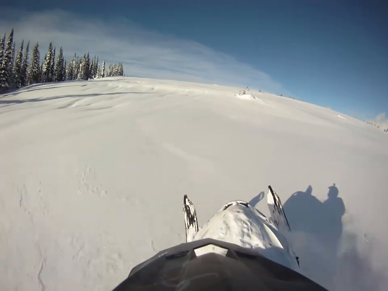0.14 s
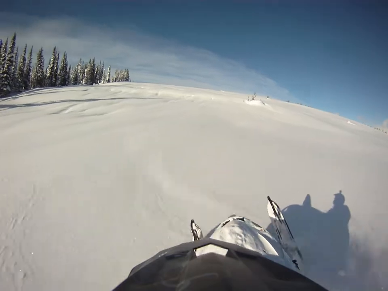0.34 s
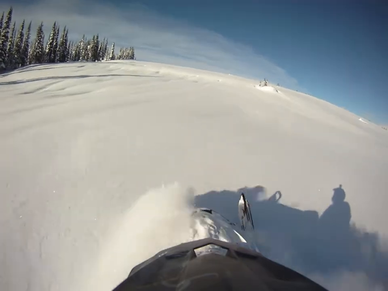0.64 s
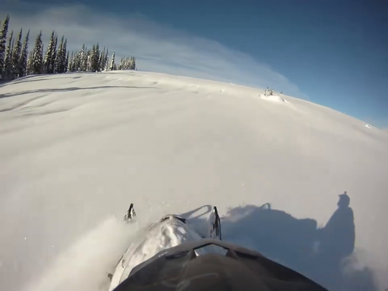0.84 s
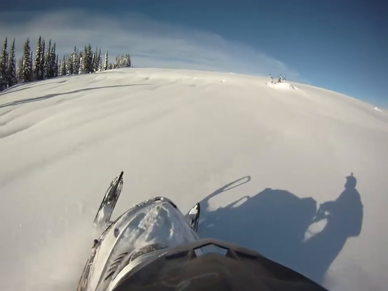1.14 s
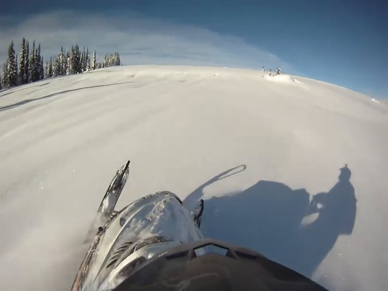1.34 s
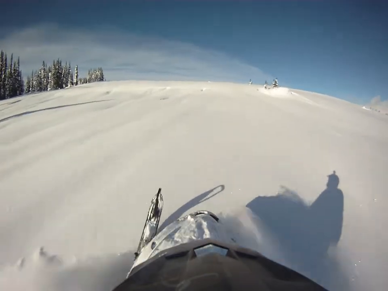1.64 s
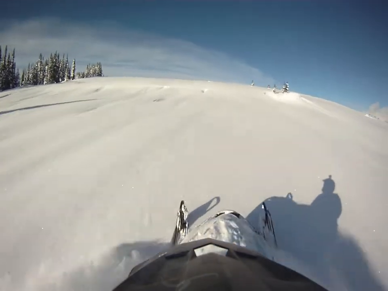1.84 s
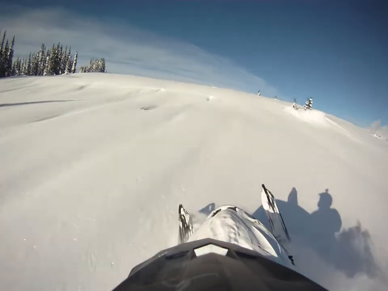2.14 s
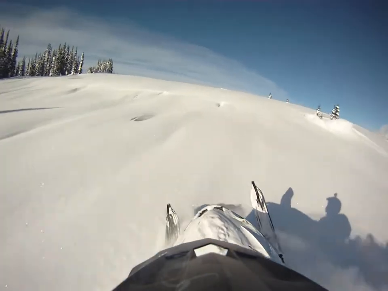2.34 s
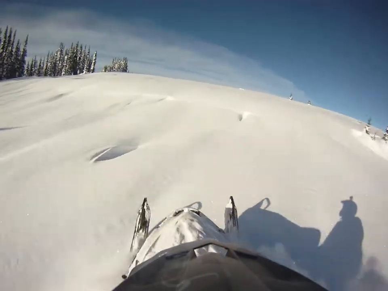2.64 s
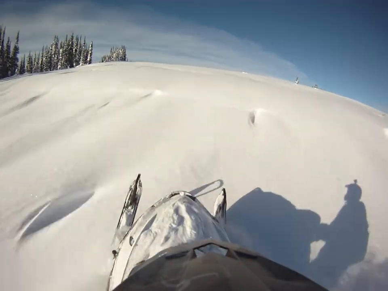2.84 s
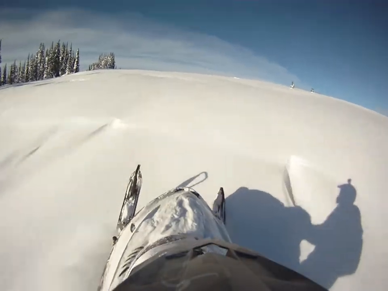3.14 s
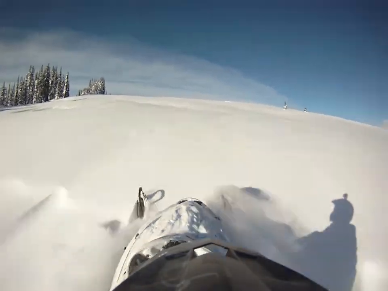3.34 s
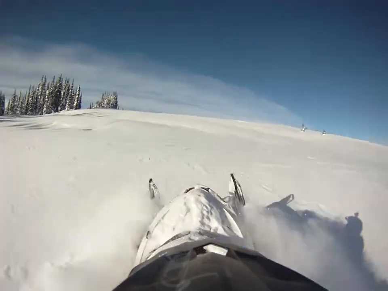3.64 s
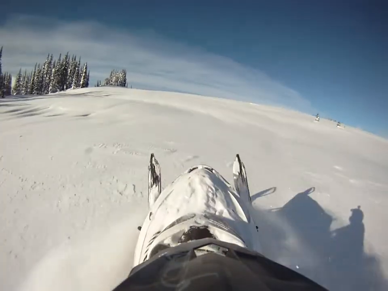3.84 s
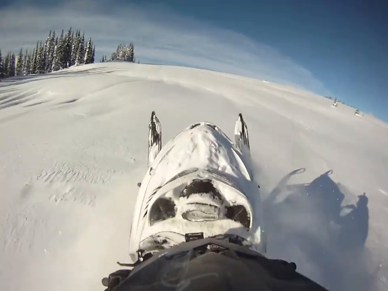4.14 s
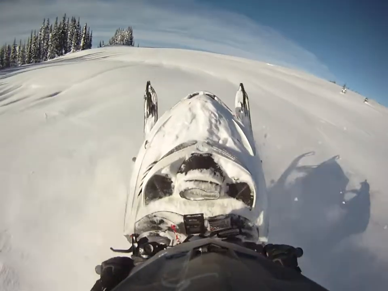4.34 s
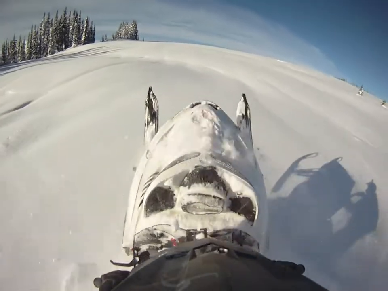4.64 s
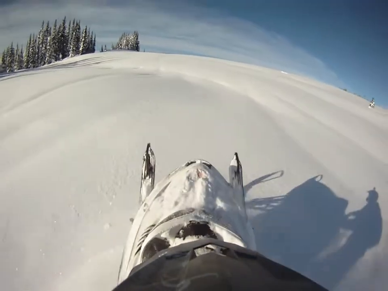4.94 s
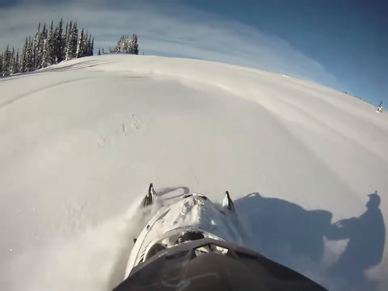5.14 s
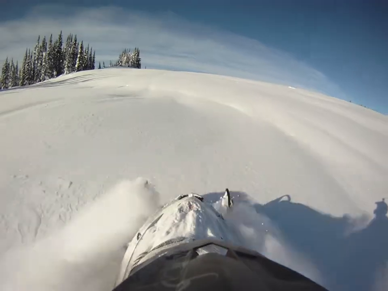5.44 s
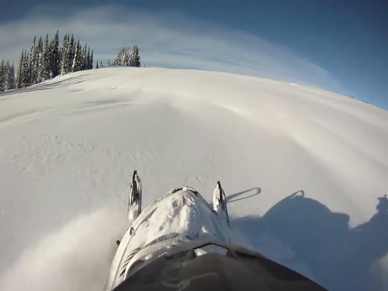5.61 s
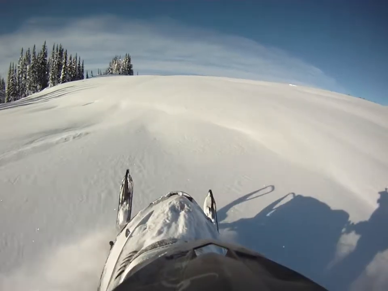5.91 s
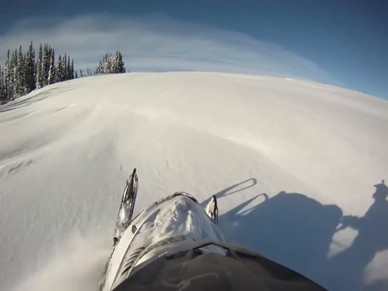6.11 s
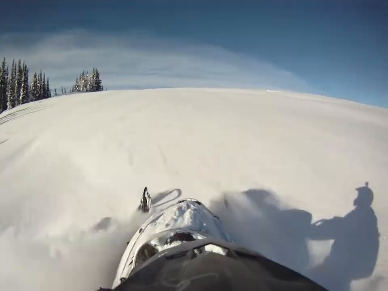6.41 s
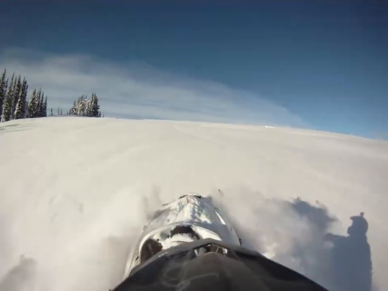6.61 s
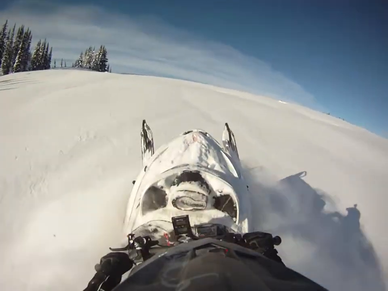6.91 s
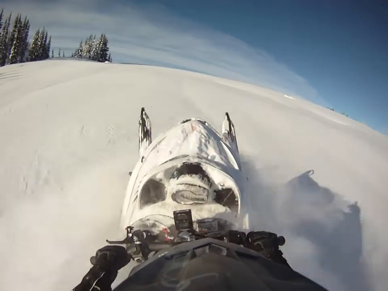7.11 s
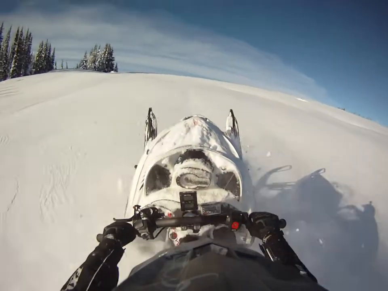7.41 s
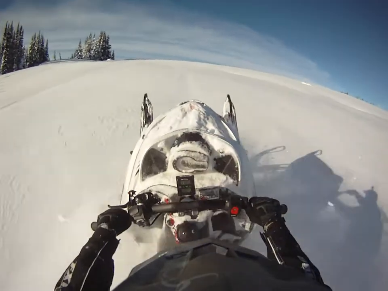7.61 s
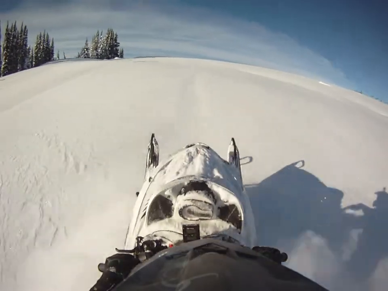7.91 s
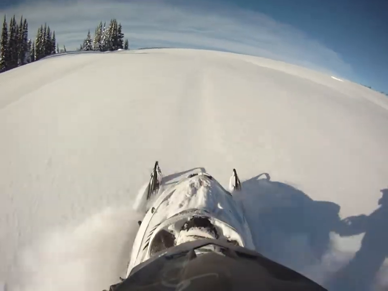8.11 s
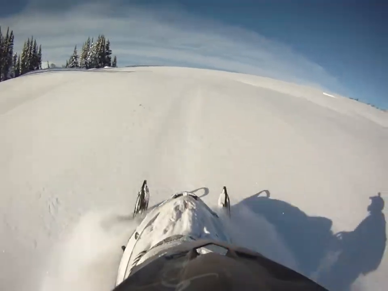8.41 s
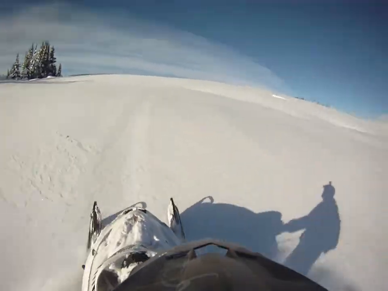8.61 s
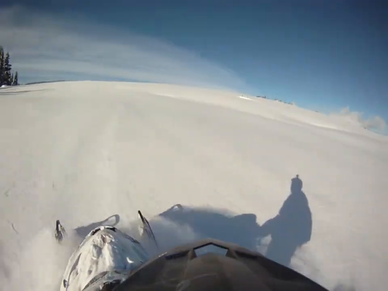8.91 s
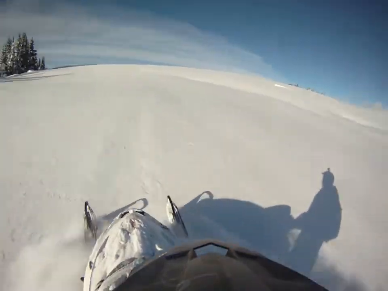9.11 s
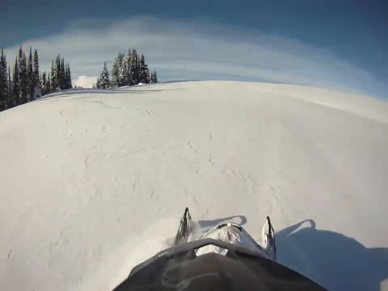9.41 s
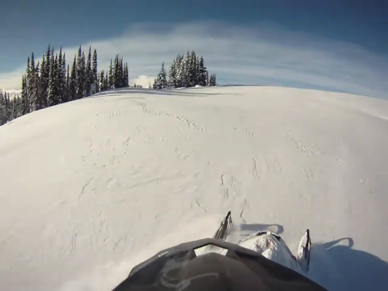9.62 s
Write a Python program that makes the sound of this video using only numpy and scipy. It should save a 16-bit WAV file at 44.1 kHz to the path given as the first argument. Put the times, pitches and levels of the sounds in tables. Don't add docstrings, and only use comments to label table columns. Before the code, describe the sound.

From the first instant a two-stroke snowmobile engine runs at full throttle, a loud, dense, nasal buzz with a ringing mid-range and a gritty metallic edge, as if heard through a sealed case on the rider's helmet. The pitch sags around 0.8 s, climbs, dips again near 2 and 2.7 s, and drops more sharply at 3.7 s before recovering to a tight whine. Further sags come at 4.8, 5.5, 6.5 and 6.8 s, with timbre shifting throughout and a small jolt near 4.8 s. Low wind buffeting, fast track drumming and a faint hiss of thrown snow sit underneath. It holds high around 7.5 s, sags near 8.1 s, then at 8.4 s the throttle shuts and the note plunges, rougher and quieter. A dull intake pop at 8.7 s leads into one blip peaking about 9.0 s, then a second, higher one at 9.4 s, before falling to a low, uneven burble at the end.

```python
import sys
import numpy as np
from scipy import signal
from scipy.fft import rfft, irfft
from scipy.io import wavfile
from scipy.ndimage import uniform_filter1d, map_coordinates

SR = 44100
rng = np.random.default_rng(int(sys.argv[2]) if len(sys.argv) > 2 else 0)


def unload_audio(sound):
    columns = np.transpose(np.atleast_2d(sound))
    steps = np.round(np.clip(columns, -1, 1) * 32767)
    wavfile.write(sys.argv[1], SR, steps.astype(np.int16))


def decibels_to_gain(level_db):
    exponent = np.asarray(level_db, float) / 20
    return 10 ** exponent


N = 430416
T = np.arange(N) / SR
HZ = np.fft.rfftfreq(N, 1 / SR)


def evened(x):
    return x / np.sqrt(np.mean(x ** 2) + 1e-20)


def curves(rows):
    s, *columns = np.transpose(rows)
    return [np.interp(T, s, column) for column in columns]


def modes(table, hz):
    power = 0
    for centre, width, db in table:
        power = power + (decibels_to_gain(db) / (1 + (2 * (hz - centre) / width) ** 2)) ** 2
    return np.sqrt(power)


def slope(points):
    hz, db = np.transpose(points)
    return decibels_to_gain(np.interp(np.log(HZ + 1), np.log(hz + 1), db))


def coloured(x, gain):
    return evened(irfft(rfft(x) * gain, N))


def drift(per_s, count=1):
    s = np.arange(0, N / SR + .02, .01)
    rate = np.geomspace(per_s / 8, per_s, 16)[:, None]
    start = rng.random((count, 16, 1))
    sines = np.sin(2 * np.pi * (rate * s + start))
    lines = (sines / np.sqrt(rate)).sum(1)
    return [np.interp(T, s, evened(line)) for line in lines]


# centre in Hz, width in Hz, level in dB.
HOUSING = [(628.5, 14.4, -14), (1297.6, 118, 1), (1528, 92, -6), (1730, 326, -5), (2140, 1170, -10.5),
           (3440, 540, -20.5), (5450, 2300, -29)]
# frequency in Hz, level in dB.
RASP = [(2600, -33), (3000, -3), (3700, -2.5), (4100, -8), (5400, -3), (5600, -5.5), (6300, -24)]


def engine():
    speed, throttle, _, rasp_db = controls()
    off_pipe = np.clip((111 - speed) / 6, 0, 1)
    slowing = np.gradient(speed) < 0
    coasting = uniform_filter1d(off_pipe * slowing, 900)
    ragged = np.clip(.18 + .55 * coasting, .15, 1)
    wobble = evened(uniform_filter1d(rng.standard_normal(N), 400))
    unsteadiness = .0018 + .003 * off_pipe + .01 * coasting
    turns = np.cumsum(speed * (1 + unsteadiness * wobble)) / SR
    own_db, body_db = engine_levels(speed, throttle)
    strong, stack, rasp = crank_orders(speed, turns, off_pipe, own_db)
    body = decibels_to_gain(2.5) * np.sqrt(1 - ragged) * evened(stack)
    body += decibels_to_gain(3.5) * np.sqrt(ragged) * gas_roar(turns)
    rasp_colour = slope([(2200, -80)] + RASP + [(6800, -60)])
    high = decibels_to_gain(rasp_db - 2) * coloured(rasp, rasp_colour)
    return strong + decibels_to_gain(body_db) * body + high


# centre in Hz, width in Hz, level in dB.
PIPE = [(340, 180, -5), (417, 60, -29), (633, 43, -15.5), (763, 108, -15.5), (873, 63, -9), (990, 41, -32),
        (1298, 127, 7.5), (1514, 55, 0), (1667, 160, -1.5), (1821, 260, -7), (2240, 430, -10),
        (2444, 61, -5), (2667, 133, -14.5)]
# centre in Hz, width in Hz, level in dB.
AIRBOX = [(652, 76, 11)]
PORTS = {3: 0., 5: 0., 6: 0., 7: 1.94, 8: -3.5, 9: 0., 11: 0.64, 12: 0., 13: -3.1, 14: 1.9, 15: 6.6, 16: 0.,
         17: -1, 18: 1., 19: 0., 20: 1, 21: -2.6}


def crank_orders(speed, turns, off_pipe, own_db):
    odd_db, wander_db, phase_slip = -6.5, 2.2, .12
    off_pipe_even_db, off_pipe_odd_db = 1, -2.5
    starts, wander = rng.random(50), drift(9., count=50)
    flutter = drift(30., count=7)
    strong, stack, rasp = np.zeros((3, N))
    for k in range(1, 50):
        odd = k % 2
        phase = k * turns + starts[k] + phase_slip * (k > 4) * wander[-k]
        line = np.sqrt(2) * np.cos(2 * np.pi * phase)
        shift_db = off_pipe_odd_db if odd else off_pipe_even_db * (k > 4)
        line *= decibels_to_gain(bloom_db(k) + (k < 9) * off_pipe * shift_db)
        steady = min(k / 15.3, 1)
        if k in own_db:
            strong += decibels_to_gain(own_db[k] + .8 * steady * wander[k] + 1.2 * flutter[k % 7]) * line
            continue
        line *= decibels_to_gain(odd_db * odd)
        line *= 1 + off_pipe * (1 - odd) * modes(AIRBOX, k * speed)
        sway_db = steady * wander_db * (1.5 + 0.41 * (k < 10)) * wander[k]
        order_db = PORTS.get(k, 0) + sway_db + 0.72 * flutter[k % 7]
        stack += modes(PIPE, k * speed) * decibels_to_gain(order_db) * line
        rasp += decibels_to_gain(4. * wander[k]) * line
    return strong, stack, rasp


def gas_roar(turns):
    surge = 2.1 + np.exp(-(2 * turns % 1) / 1.2)
    puffs = surge * rng.standard_normal(N)
    return coloured(puffs, modes(HOUSING, HZ)) * decibels_to_gain(1.2 * drift(14.)[0])


# time in seconds, exhaust boom in dB, bark shading in dB, hood shading in dB.
HELMET = [(0.0, -28.5, 6, -0.5), (0.16, -30.5, 6, -3), (0.37, -36.5, -7, -1), (1.0, -28, 8, 3.5),
          (1.17, -23.5, -3.5, -1), (2.17, -29.5, -4.5, 2), (2.55, -26.5, -1, 5), (2.9, -20.5, -3.5, 3),
          (3.9, -30, 2, -2), (6.01, -29, 1.5, 0.5), (6.29, -23.5, -3, 0.5), (6.67, -32, 5, 1),
          (7.32, -29.5, -7, -4), (7.86, -36.5, 1, -1.5), (8.26, -25, 6, 2), (8.4, -40, -7, -3.5)]
# crank speed in rev/s, level in dB.
BARK = [(72, -18), (97, -20), (107, -25.5), (113, -25.5), (119, -29), (124, -36), (132, -39.5)]
# crank speed in rev/s, level in dB.
WHISTLE = [(75, -48), (105, -47), (113, -37), (117, -25.5), (122, -24.5), (127, -19.5), (132, -13.5)]


def engine_levels(speed, throttle):
    shut = 1 - throttle
    shut_roar_db, shut_boom_db, shut_bark_db = -7, -8, -19
    boom_db, bark_db, hood_db = curves(HELMET)
    stop_boom_db = 3. * (speed < 108)
    own_db = {2: boom_db + shut_boom_db * shut + stop_boom_db,
              4: np.interp(speed, *np.transpose(BARK)) + bark_db + shut_bark_db * shut,
              10: np.interp(speed, *np.transpose(WHISTLE)) + shut_roar_db * shut}
    thickening_db = 0.1057 * np.maximum(speed - 120, 0)
    thinning_db_per_rev = 0.56 * throttle + 0.28 * shut
    thinning_db = thinning_db_per_rev * np.minimum(speed - 93, 0)
    body_db = hood_db - 19 + thickening_db + shut_roar_db * shut + thinning_db
    return own_db, body_db


# centre in seconds, crank order, level in dB, length in
# seconds.
BLOOMS = [(0.553, 6, 7, 0.6), (0.557, 12, 3, .25), (1.015, 10, -9, 0.9), (1.0, 6, -16, 0.44),
          (1.39, 6, 7, 0.58), (1.793, 4, 11.5, 1), (1.715, 14, 8, 0.18), (1.738, 10, -5, 0.3),
          (2.606, 15, 4, 0.36), (2.645, 20, 3, 0.46), (3.224, 10, -11, 0.33), (3.267, 14, 9, 0.4),
          (4.57, 12, 7.5, .35), (4.62, 14, -19, 0.64), (4.6, 13, -7, .6), (4.85, 10, 4, 0.91),
          (4.9, 7, 10, 1), (5.926, 12, 5.5, .35), (6.093, 14, 9.5, 0.56), (7.04, 7, 11.5, 0.54),
          (7.414, 14, -26, 1), (7.352, 16, 10, 0.59), (7.55, 13, -18, 0.8), (7.6, 15, -16, 0.6),
          (7.804, 7, 9.5, 0.67), (2.302, 4, -4, 0.74), (4.17, 28, 10, 0.35), (1.35, 24, 6, 0.53),
          (1.352, 42, 10.5, 0.77)]


def bloom_db(order):
    total = 0
    for s, k, db, length in BLOOMS:
        if k == order:
            total = total + db * np.cos(np.pi * np.clip((T - s) / length, -.5, .5)) ** 2
    return total


# deepest point in seconds, sag in rev/s, dig-in in seconds, climb-out in seconds.
DRIFTS = [(.43, 4.6, .69, .24), (.76, 14.4, .36, .65), (1.99, 10.1, .73, .84), (2.73, 10.1, .52, .68),
          (3.3, 4.4, .15, .34), (3.71, 13.7, .45, .35), (4.79, 8.7, .62, .65), (5.53, 18.2, .71, .47),
          (6.11, 4, .56, .28), (6.47, 9.4, .34, .27), (6.78, 14.9, .36, .6), (8.09, 17.8, .77, .25),
          (8.34, 17, .24, 2)]
# time in seconds, crank speed in rev/s, throttle from 0 to 1.
STOP = [
    [(8.38, 114.4, 1), (8.41, 109.5, 1), (8.45, 102, 0), (8.576, 82.5, 0), (8.71, 71, 0)],
    [(8.768, 72.8, 1), (8.964, 96.6, 1), (9.032, 98.8, 0), (9.15, 82, 0)],
    [(9.178, 83.2, 1), (9.238, 89.5, 1), (9.398, 107.3, 1), (9.46, 100, 0), (9.636, 79.9, 0),
     (9.68, 77.5, 0), (9.72, 75.5, .6), (9.76, 73.9, .6)],
]
# time in seconds, wind and lug thumps in dB, thrown snow in dB.
RIDE = [(0.0, -44, -35.5), (1.06, -36.5, -30), (3.7, -38, -30.5), (3.75, -35, -32.5), (4.1, -44, -32),
        (4.67, -37, -28), (6.79, -40.5, -32.5), (6.87, -33, -28.5), (7.01, -38, -28), (7.07, -35, -28),
        (7.26, -49, -32.5), (7.91, -35.5, -26.5), (8.4, -37, -32), (8.45, -44, -43), (8.62, -39, -40),
        (9.38, -39, -36), (9.57, -47, -47), (9.76, -33, -41)]


def controls():
    free_speed = 131.6
    sag = 0
    for s, depth, dig, climb in DRIFTS:
        away = np.where(T < s, (s - T) / dig, (T - s) / climb)
        sag = sag + depth * np.cos(np.pi / 2 * np.clip(away, 0, 1)) ** 2
    stop, throttle = curves(sum(STOP, []))
    riding = T < STOP[0][0][0]
    speed = uniform_filter1d(np.where(riding, free_speed - sag, stop), 1800)
    wind_db, spray_db = curves(RIDE)
    spray_db = spray_db - 0.5 - 2.5 * (1 - throttle)
    return speed, throttle, wind_db - 6.5, spray_db


# centre in Hz, width in Hz, level in dB.
LUGS = [(95, 35, -0.5), (198, 120, -5)]


def track():
    speed, _, wind_db, _ = controls()
    geared = np.maximum(speed - 1.4 * (131 - speed), 88)
    beat = geared * (1 + 0.0315 * drift(10.)[0])
    turns = np.cumsum(beat) / SR
    drumming = sum(modes(LUGS, k * beat) * np.cos(2 * np.pi * k * turns) for k in (1, 2))
    return decibels_to_gain(wind_db + 5.5) * drumming


# frequency in Hz, level in dB per Hz.
WIND = [(12, -55), (20, -28.5), (97, -6.5), (189, -20), (239, -18), (293, -17), (364, -19), (553, -22.5),
        (1100, -29), (1430, -48), (2420, -120)]


def wind():
    wind_db = controls()[2]
    return coloured(rng.standard_normal(N), slope(WIND)) * decibels_to_gain(wind_db + 5.0 + 0.4 * drift(16.0)[0])


# frequency in Hz, level in dB per Hz.
SPRAY = [(1500, -49), (2600, -48), (3600, -4.5), (4100, -4.5), (5300, -0.5), (5600, -12), (6400, -19),
         (7000, -60)]


def thrown_snow():
    spray_db = controls()[3]
    clusters = evened(uniform_filter1d(rng.standard_normal(N), 60))
    grains = rng.standard_normal(N) * decibels_to_gain(4.0 * clusters)
    return coloured(grains, slope(SPRAY)) * decibels_to_gain(spray_db - 7 + 1.2 * drift(9.)[0])


# centre in seconds, peak in dB, frequency in Hz, length in seconds.
KNOCKS = [
    (4.756, -21, 165, 0.02),
    (8.727, -24, 402, 0.023),
    (9.165, -32, 452, 0.014),
    (9.699, -33, 443, 0.026),
]


def knocks():
    out = np.zeros(N)
    for s, db, hz, length in KNOCKS:
        u = np.clip((T - s) / length + .5, 0, 1)
        out += decibels_to_gain(db) * np.sin(np.pi * u) ** 2 * np.sin(2 * np.pi * hz * (T - s))
    return out


def scene():
    return (engine() + track() + wind() + thrown_snow() + knocks())[None]


def band_limit(x):
    return signal.sosfilt(signal.butter(12, 15760, fs=SR, output="sos"), x)


# start in seconds, end in seconds.
SLIPPING = (.80, 1.98)


def record(dry):
    hold, slip = 4, 32
    fast = 12000 * hold
    power_db = 10 * np.log10(uniform_filter1d(dry[0] ** 2, size=3000) + 1e-9)
    excess_db = np.maximum(power_db + 16.5, 0)
    levelled = dry[0] / decibels_to_gain(.7 * excess_db)
    limited = np.tanh(levelled / 0.93) * 1.328
    smooth = signal.oaconvolve(limited, signal.firwin(61, 6600, fs=SR), "same")
    tick = np.arange(N * fast // SR + fast // 100)
    slipped = np.clip(tick / fast, *SLIPPING) - SLIPPING[0]
    read_at = tick + slipped * fast / slip
    taken = np.interp(np.arange(0, read_at[-1], hold), read_at, tick / fast)
    slow = map_coordinates(smooth, [taken * SR], order=3, mode="nearest")
    held = slow[read_at.astype(int) // hold]
    resampled = signal.resample_poly(held, 147, 160)[:N]
    edged = signal.oaconvolve(resampled, signal.firwin(401, 15350, fs=SR), "same")
    return band_limit(edged[None])


dry = scene()
out = record(dry)
unload_audio(out)
```